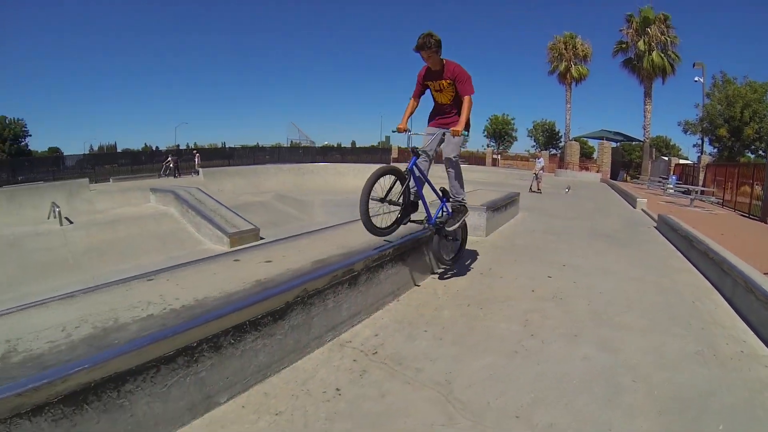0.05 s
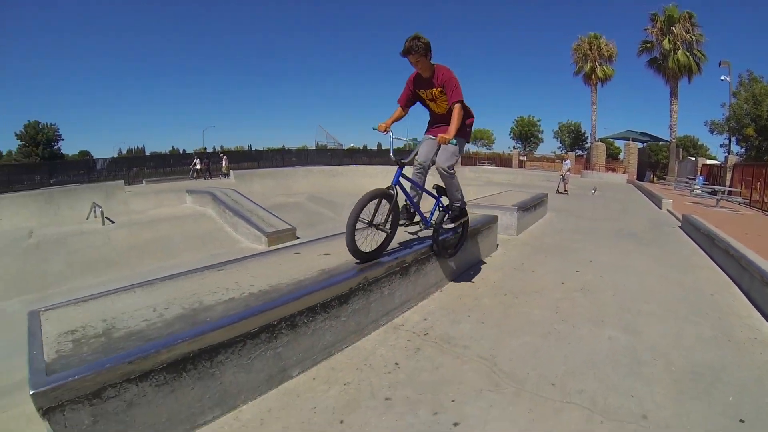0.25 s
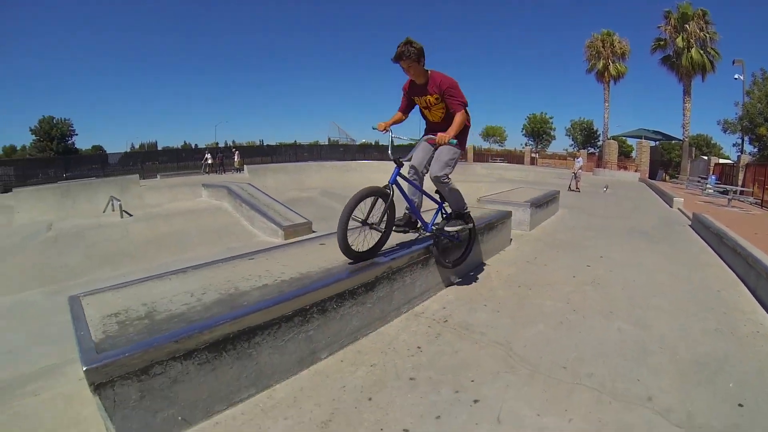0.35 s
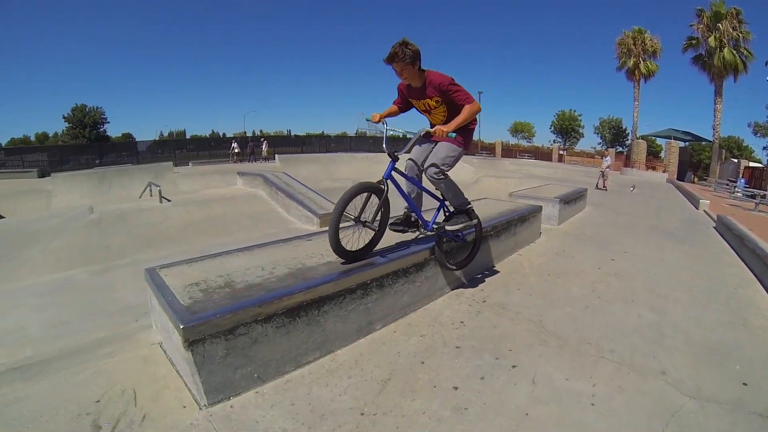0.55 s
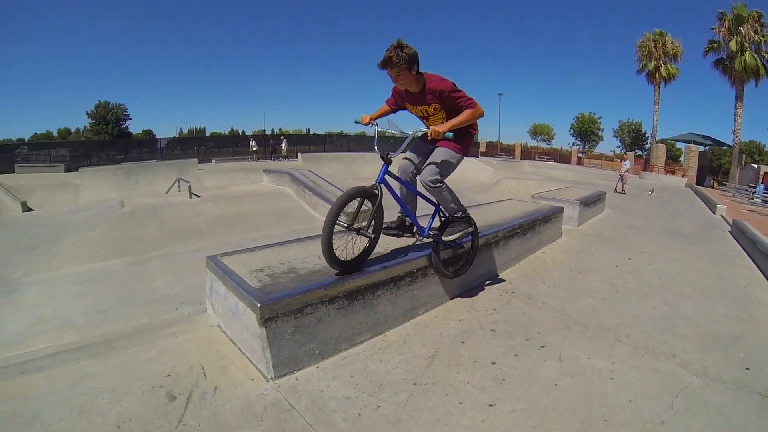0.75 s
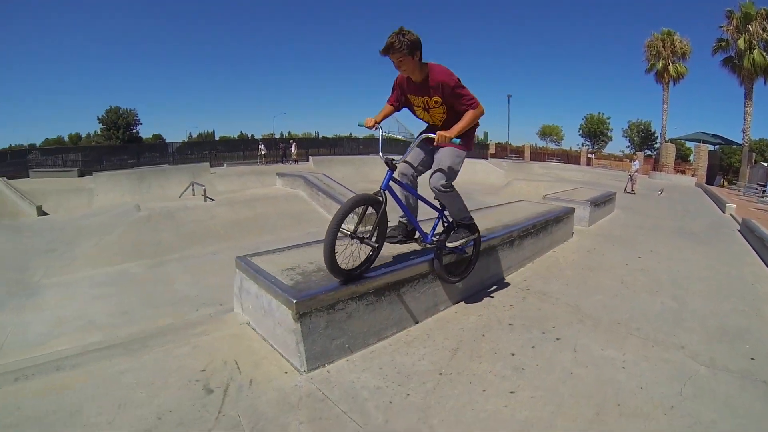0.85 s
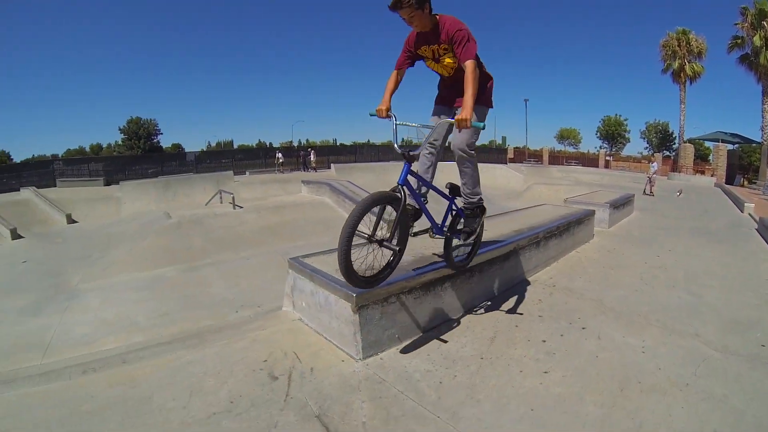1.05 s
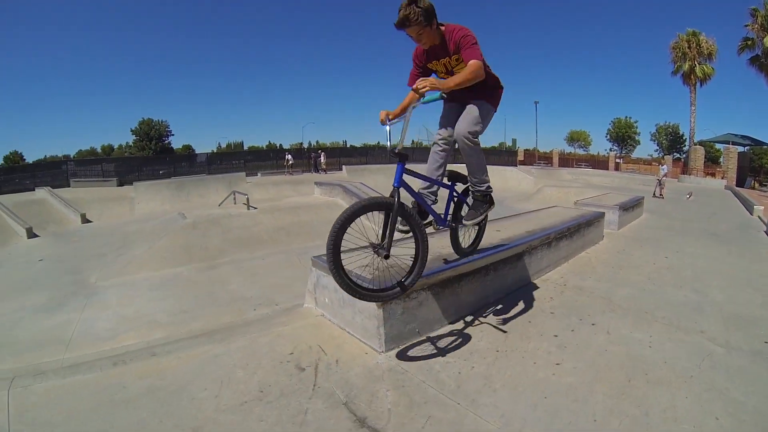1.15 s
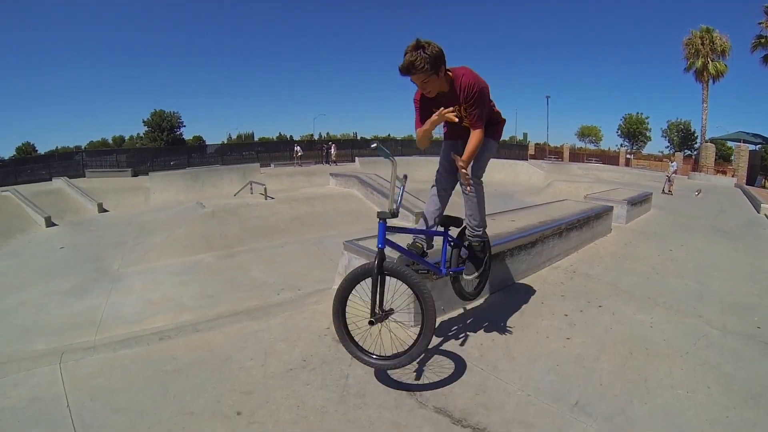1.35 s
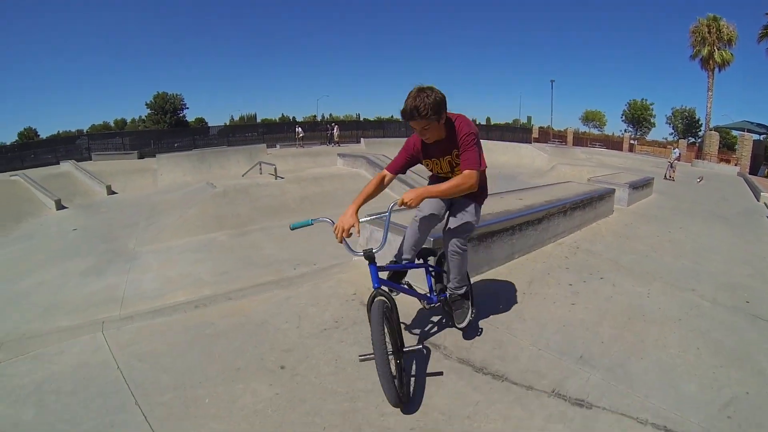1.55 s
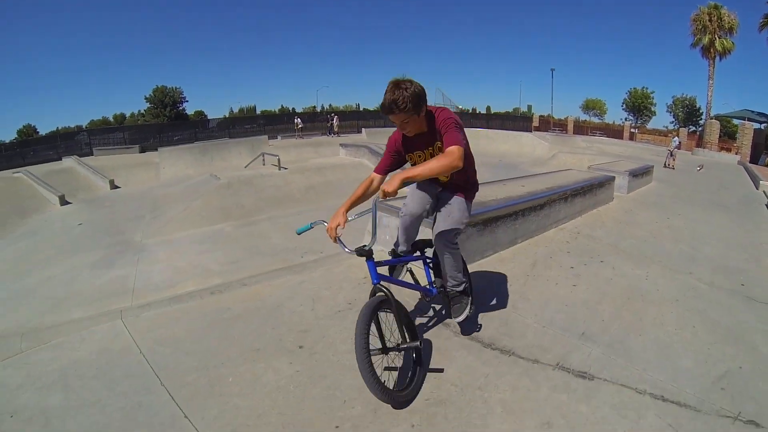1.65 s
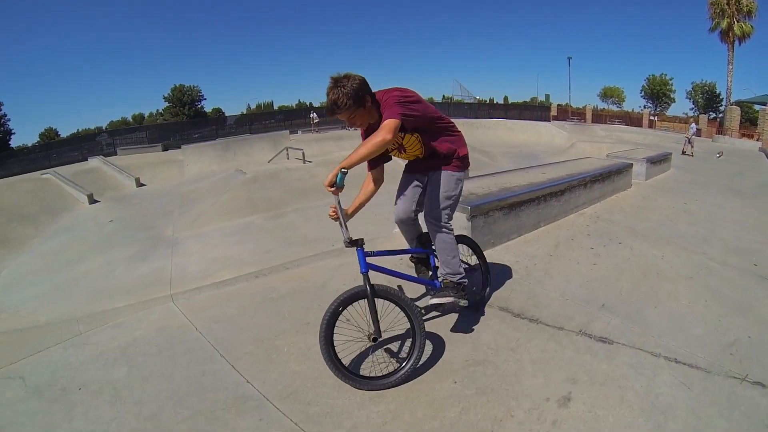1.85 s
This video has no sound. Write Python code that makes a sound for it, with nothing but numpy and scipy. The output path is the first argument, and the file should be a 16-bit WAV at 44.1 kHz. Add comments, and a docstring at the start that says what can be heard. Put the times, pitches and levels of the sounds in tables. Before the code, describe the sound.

A bike's steel peg hits a ledge with a loud clack and scrapes along it, squeaking briefly. The bike lands with a thud, tyre scrub and rattle, then rolls on outdoors, with low wind on the microphone.

```python
"""Wheels roll on concrete and bearings hiss, while wind buffets a microphone travelling alongside.
A bike hops onto a skatepark ledge with a bump, a steel tick and a tyre scuff. Its steel peg clacks
down and grinds along the edge: grit scrapes and rings the frame, and the steel sticks and slips in
short squeaks. The bike drops off and lands with a thud, scrubbing tyres and a rattle of loose parts
and chain, then rolls on."""
import sys
import numpy as np
from scipy import signal
from scipy.fft import rfft, irfft
from scipy.io import wavfile

SR = 44100
rng = np.random.default_rng(int(sys.argv[2]) if len(sys.argv) > 2 else 0)


def unload_wav(signal):
    """Save mono or channel-first audio to the path in sys.argv[1] as 16-bit WAV at rate SR, clipped to [-1, 1]."""
    wavfile.write(
        sys.argv[1],
        SR,
        np.round(np.clip(np.atleast_2d(signal).T, -1, 1) * 32767).astype(np.int16),
    )


N = 83790
T = np.arange(N) / SR

# A "tone" table says how strong the lows and highs are. A "fade" is the time taken to drop by 60 dB.
# wheels on concrete, their bearings, and wind (time [s], level [dB])
ROLL_LEVELS = [(0, -56.5), (1.2, -53), (1.9, -52)]
BEARING_LEVELS = [(0, -57), (.9, -56.5), (1.0, -62), (1.12, -58.5), (1.28, -53.5), (1.335, -60),
                  (1.52, -53), (1.69, -58.5), (1.76, -53), (1.83, -51.5), (1.9, -58.5)]
WIND_LEVELS = [(0, -40), (.88, -41.5), (1.03, -38), (1.22, -42.5), (1.38, -35.5), (1.9, -40)]
# tone of those three (frequency [Hz], level [dB])
ROLL_TONE = [(100, 3.5), (200, 11.5), (330, -1), (650, 2), (1100, -3.5), (2000, -12.5), (3500, -41),
             (15000, -26)]
BEARING_TONE = [(1000, 0.5), (2300, 4), (2900, -1), (3600, 7.5), (4150, 8), (4700, -3.5), (6500, -8),
                (8000, -12.5), (10700, -7), (15000, -28)]
WIND_TONE = [(8, -11.5), (25, 3), (45, -0.5), (75, -4.5), (150, -15.5), (600, -67)]

# tyre bumps (time [s], level [dB])
BUMPS = [(.199, -39.5), (.995, -39), (1.127, -42), (1.358, -39.5), (1.392, -38), (1.822, -40)]
# tone of a bump (frequency [Hz], level [dB])
BUMP_TONE = [(40, 6), (170, 3.5), (350, -0.5), (1500, -13), (6000, -46)]
# notes of the steel tick in the hop (frequency [Hz], level [dB], fade [s])
TICK_NOTES = [(4100, -32, .022), (1000, -42, .04)]
# tyres scuff the ledge and scrub on landing (start [s], rise [s], hold [s], fade [s], level [dB])
SCUFFS = [(.2355, 0.0031, 0.039, 0.033, -35), (.29, 0.0022, 0.052, 0.033, -38)]
SCRUBS = [(1.392, 0.0016, 0.072, 0.027, -37.5), (1.422, 0.0056, 0.036, 0.17, -33.5)]
# tone of each kind of rub (frequency [Hz], level [dB])
SCUFF_TONE = [(170, 10.5), (320, -2), (900, 3.5), (1500, -2.5), (3300, -5), (4200, 1), (5200, -17),
              (10000, -22.5), (15000, -39)]
SCRUB_TONE = [(80, 10.5), (230, 13.5), (820, 7.5), (1200, -1), (2100, -6.5), (2900, -12.5), (4200, -12.5),
              (6000, -25), (11000, -27), (15000, -47)]

# the peg hits the edge (time [s], crack [dB], ring [dB], thump [dB])
CLACKS = [(0.2859, -13, -27.5, -52), (0.2888, -16, -48, -9), (0.294, -21, -42, -36),
          (0.306, -24.5, -45.5, -24.5)]
# tone of the crack (frequency [Hz], level [dB])
CRACK_TONE = [(60, -5), (200, -12), (900, 2.5), (1400, -7), (2100, 6), (2900, -13), (3900, -4.5),
              (5400, -21), (6300, -10), (7200, -36), (10200, -16), (15000, -38)]
# bright notes of the struck peg (frequency [Hz], level [dB], fade [s])
PEG_NOTES = [(425, -3, .2), (1109, 2, .08), (1500, -10, .3), (1669, -2, .08), (1865, 11, .036),
             (2250, 11, .03), (2525, -2, .08), (3620, -5, .08)]

# spray of fine grit under the peg (time [s], level [dB])
SPRAY_LEVELS = [(.286, -67), (.292, -53), (0.336, -49), (.37, -64.5), (.52, -67), (0.592, -61.5),
                (.83, -65)]
# the grind (time [s], ringing body [dB], scrape [dB])
GRIND_LEVELS = [(0.287, -44, -65), (0.292, -23.5, -25), (0.328, -42, -52), (.36, -32, -51.5),
                (.44, -31, -45.5), (0.523, -38.5, -45.5), (.585, -38.5, -43.5), (.655, -42.5, -52),
                (.738, -37, -52.5), (.785, -42.5, -48), (0.833, -34, -46), (0.889, -34, -42),
                (0.925, -41.5, -43.5), (.975, -53, -63.5), (1.02, -86, -83)]
# tone of the spray, the grind's body and its scrape (frequency [Hz], level [dB])
SPRAY_TONE = [(3000, 1.5), (6300, -9), (11500, -1), (13000, -19), (15000, -27)]
BODY_TONE = [(80, -63), (170, -5), (290, -38), (400, 7.5), (750, 10.5), (1100, -4.5), (1250, -55),
             (1600, 2), (3000, -56)]
SCRAPE_TONE = [(200, -23), (500, 1), (1130, 5), (1230, -0.5), (1500, 2.5), (2330, 2), (2650, -7),
               (4100, -7), (4800, -14.5), (6500, -22), (11000, -34), (15000, -70)]
# steel edge and frame ringing in the slide (frequency [Hz], early level [dB], late level [dB], fade [s])
EDGE_NOTES = [(5950, 1, -6, .12), (6500, 3, -2, .03), (8900, 0, -2, .1)]
FRAME_NOTES = [(168, -5, -3, .12), (397, -8, 2, .12), (430, -4, -14, .1), (502, -2, -8, .1),
               (558, 2, -7, .13), (600, 0, -8, .14), (673, -5, 2, .11), (818, -5, -6, .07),
               (915, -5, -7, .06), (1065, -12, 2, .045), (1111, -6, -4, .1), (1495, -10, -9, .1),
               (1670, -9, -12, .14), (4450, -36, -7, .007)]
# groans and squeaks (loudest moment [s], half length [s], pitch [Hz], glide [Hz/s], level [dB])
SQUEAKS = [(.318, .018, 465, 4000, -32), (.442, .024, 555, 0, -35), (.560, .028, 1490, 0, -45),
           (.689, .015, 5110, 1000, -50), (.768, .016, 6550, 0, -60)]

# loose parts clink and chain links jingle (time [s], level [dB])
CLINKS = [(1.302, -49), (1.458, -35), (1.4842, -39), (1.5235, -44), (1.5805, -42)]
JINGLES = [(1.395, -57.5), (1.4845, -52.5), (1.496, -57)]
# notes of the shaken bike and its chain (frequency [Hz], level [dB], fade [s])
BIKE_NOTES = [(237, -3, .45), (395, -3, .25), (570, -9, .8), (690, 2, .4), (850, 2, .13), (1588, -11, .25),
              (1755, -5, .42), (2080, 6, .035), (3955, -16, .5), (4400, -23, .3)]
CHAIN_NOTES = [(7150, -2, .06), (10480, -2, .1)]
# wheels and frame take the landing (time [s], knock [dB], thud [dB])
LANDINGS = [(1.4214, -25.5, -23.5), (1.434, -25, -17.5), (1.4484, -32, -27.5)]
# tone of a clink and of a landing knock (frequency [Hz], level [dB])
CLINK_TONE = [(300, -34), (900, 14.5), (1300, 3), (1900, 12), (2900, -1), (4100, 5.5), (5200, -5),
              (10500, -20), (15000, -35)]
KNOCK_TONE = [(60, -49), (250, 7.5), (750, 4), (1200, -3), (2100, 1.5), (2900, -16), (4200, -4),
              (7000, -21.5), (10500, -40), (15000, -51)]


def amp(db):
    """Turns decibels into a number to multiply by."""
    return 10 ** (np.asarray(db) / 20)


def follow(levels):
    """A volume curve through (time, level) points."""
    return amp(np.interp(T, *np.transpose(levels)))


def unit(x):
    """Scales a sound to an average strength (rms) of 1."""
    return x / np.sqrt(np.mean(x ** 2) + 1e-20)


def colour(x, tone):
    """Shapes the lows and highs of a sound, at strength 1."""
    hz, db = np.transpose(tone)
    curve_db = np.interp(np.log(np.fft.rfftfreq(N, 1 / SR) + 1), np.log(hz), db)
    return unit(irfft(rfft(x) * amp(curve_db), N))


def noise(tone):
    """Steady noise with the given tone."""
    return colour(rng.standard_normal(N), tone)


def grit(per_s=2600, spread_db=2):
    """Tiny random collisions of uneven size."""
    hits = (rng.random(N) < per_s / SR) * rng.choice([-1, 1], N)
    sizes = amp(spread_db * np.minimum(rng.exponential(1, N), 4))
    return unit(hits * sizes)


def envelope(start, rise, fade, hold=0):
    """A volume that rises, holds and dies away; times in seconds."""
    fading_for = np.maximum(T - start - rise - hold, 0)
    return np.clip((T - start) / rise, 0, 1) * np.exp(-np.log(1000) * fading_for / fade)


def rolling():
    """Bearings hiss, tick and crackle with dirt over the low roll of wheels on concrete."""
    ticks_per_s = 170 * (1 + 0.16 * noise([(40, -7.5), (400, -63.5)]))
    tick_count = np.cumsum(ticks_per_s) / SR
    ticking = unit(0.5 + np.exp(-(tick_count % 1) / 1.2))  # jumps up at each tick, then sinks
    hiss = ticking * rng.standard_normal(N)
    dirt = amp(-6) * grit(per_s=230)
    bearings = colour(hiss + dirt, BEARING_TONE)
    roll = colour(grit(per_s=2300, spread_db=0.5), ROLL_TONE)
    return follow(BEARING_LEVELS) * bearings + follow(ROLL_LEVELS) * roll


def wind():
    """Gusts push on the microphone and make a low rumble."""
    return follow(WIND_LEVELS) * noise(WIND_TONE)


def taps(hits, tone, fade):
    """Small hits that die quickly, each a burst of noise."""
    return sum(amp(db) * envelope(start, 0.00065, fade) * noise(tone) for start, db in hits)


def reflections(sound):
    """The concrete all around throws back short, thin echoes."""
    echoes = grit(per_s=2000, spread_db=2.5) * envelope(start=0.016, rise=0.0032, fade=0.45)
    echoes = signal.lfilter([1], [1, -.6], echoes)  # dulls the highs
    return signal.fftconvolve(sound, echoes / np.linalg.norm(echoes))[:N]


def ring(notes, start):
    """Struck metal sounds several notes at once, each fading at its own speed."""
    return sum(amp(db) * envelope(start, 0.00037, fade) * np.sin(2 * np.pi * (hz * T + rng.random()))
               for hz, db, fade in notes)


def tyre_rubs(rubs, tone):
    """Rubber dragged over concrete catches on thousands of tiny grains."""
    return sum(amp(db) * envelope(start, rise, fade, hold) * colour(grit(7000, spread_db=1), tone)
               for start, rise, hold, fade, db in rubs)


def swing(start, hz, fade):
    """One vibration dying away after a push; a low one is a thump."""
    return envelope(start, 0.0018, fade) * np.sin(2 * np.pi * hz * (T - start))


def peg_clack():
    """The peg slams on the edge and bounces; each blow cracks, rings and thumps."""
    out = np.zeros(N)
    for start, crack_db, ring_db, thump_db in CLACKS:
        out += amp(crack_db) * envelope(start, rise=0.0018, fade=0.015) * noise(CRACK_TONE)
        out += amp(ring_db) * ring(PEG_NOTES, start)
        out -= amp(thump_db) * swing(start, hz=156.6, fade=0.024)
    return out


def sliding_ring(grains, notes):
    """Grains keep metal ringing; its notes swell and sink as the contact point slides."""
    weight_shift_s = (0.35, 0.87)  # the rider's weight moves: early levels turn into late ones
    out = np.zeros(N)
    for hz, early_db, late_db, fade in notes:
        drift_db = 3.5 * noise([(6.3, 0), (12.6, -80)])
        db = np.interp(T, weight_shift_s, [early_db, late_db]) + drift_db
        note = irfft(rfft(grains) * rfft(swing(0, hz, fade)), N)  # every grain starts a swing
        out += amp(db) * unit(note)
    return unit(out)


def spray():
    """Fine grit crushed under the peg hisses and makes the steel edge sing faintly."""
    grains = grit()
    hiss = unit(colour(grains, SPRAY_TONE) + amp(-1.5) * sliding_ring(grains, EDGE_NOTES))
    spraying = (T > SPRAY_LEVELS[0][0]) & (T < SPRAY_LEVELS[-1][0])
    return spraying * follow(SPRAY_LEVELS) * hiss


def grind():
    """Grit under the sliding peg rings the frame and scrapes."""
    times, body_db, scrape_db = np.transpose(GRIND_LEVELS)
    grains = grit()
    body = amp(-3.5) * sliding_ring(grains, FRAME_NOTES) + amp(-9) * colour(grains, BODY_TONE)
    body *= amp(np.interp(T, times, body_db))
    scrape = amp(np.interp(T, times, scrape_db)) * colour(grains, SCRAPE_TONE)
    sliding = (T > times[0]) & (T < times[-1])
    return sliding * (body + scrape)


def squeaks():
    """Steel sticks and slips on the edge, making brief, raspy notes."""
    out = np.zeros(N)
    for middle, half_length, hz, glide, db in SQUEAKS:
        waver_hz = 36 * noise([(36, 0), (360, -20)])
        pitch = hz + glide * (T - middle) + waver_hz
        swell = np.exp(-((T - middle) / half_length) ** 2)
        out += amp(db) * swell * np.sqrt(2) * np.sin(2 * np.pi * np.cumsum(pitch) / SR)
    return chatter() * out


def chatter():
    """The fast, uneven flutter in volume of metal buzzing against metal."""
    return unit(1 + 0.45 * noise([(150, 0), (1500, -90)]))


def rattle():
    """Loose parts tap the frame and set it ringing; the chain jingles."""
    frame = sum(amp(db - 12) * ring(BIKE_NOTES, start) for start, db in CLINKS)
    chain = sum(amp(db) * ring(CHAIN_NOTES, start) for start, db in JINGLES)
    return taps(CLINKS, CLINK_TONE, fade=0.046) + chatter() * (frame + chain)


def landing():
    """The tyres thud on the ground; the bike knocks and rings roughly."""
    out = np.zeros(N)
    for start, knock_db, thud_db in LANDINGS:
        knock = envelope(start, rise=0.0012, fade=0.023) * noise(KNOCK_TONE)
        ringing = amp(-14) * chatter() * ring(BIKE_NOTES, start)
        thud = swing(start, hz=65, fade=0.1)
        out += amp(knock_db) * (knock + ringing) + amp(thud_db) * thud
    return out


def scene():
    """Rolling and wind under the hop, slide and drop with their echoes, all louder on the left."""
    background = rolling() + wind()
    hop = taps(BUMPS, BUMP_TONE, fade=0.076) + ring(TICK_NOTES, start=0.2015)
    hop += tyre_rubs(SCUFFS, SCUFF_TONE)
    slide = peg_clack() + spray() + grind() + squeaks()
    drop = rattle() + tyre_rubs(SCRUBS, SCRUB_TONE) + landing()
    bike = hop + slide + drop
    mono = background + bike + amp(-18) * reflections(bike)
    return amp([[3.02], [-4.67]]) * mono  # left, right


def record(dry):
    """Rounds off the sharpest peaks, then cuts the very highest treble."""
    ceiling, cutoff_hz = 0.8, 15200
    peak = np.max(abs(dry), axis=0)
    rounded = dry / (1 + (peak / ceiling) ** 6) ** (1 / 6)
    treble_cut = signal.firwin(401, cutoff_hz, window=("kaiser", 9), fs=SR)
    return signal.oaconvolve(rounded, treble_cut[None], "same")


dry = scene()
out = record(dry)
unload_wav(out)
```